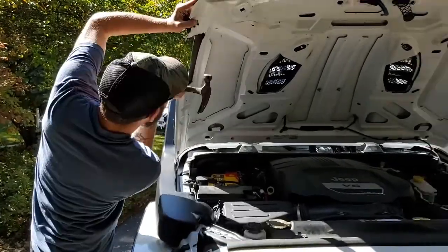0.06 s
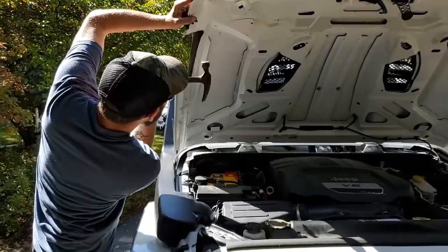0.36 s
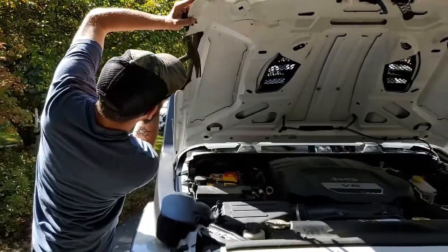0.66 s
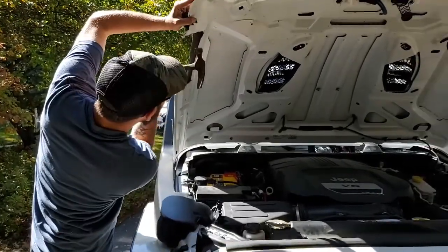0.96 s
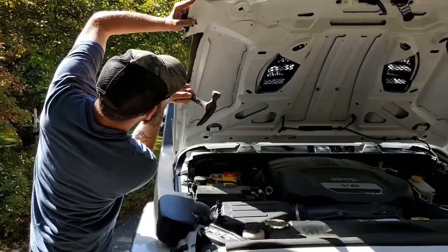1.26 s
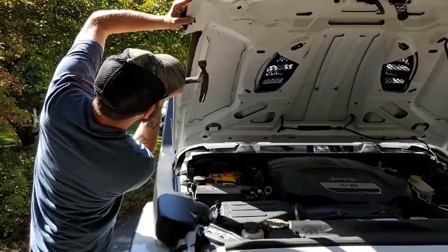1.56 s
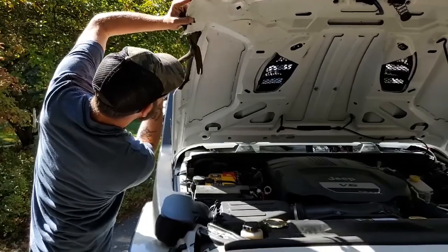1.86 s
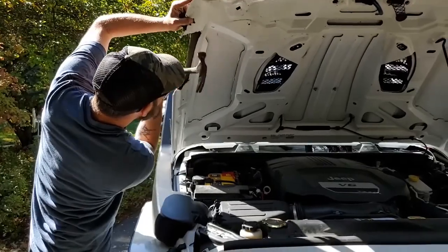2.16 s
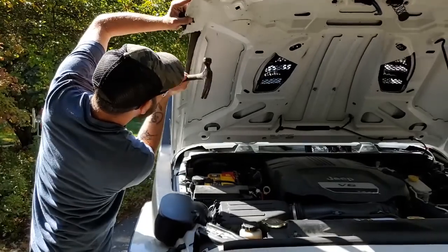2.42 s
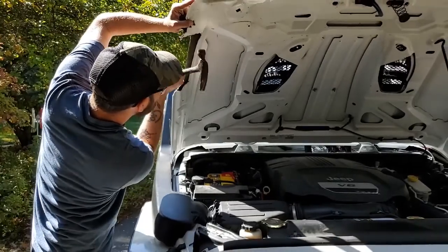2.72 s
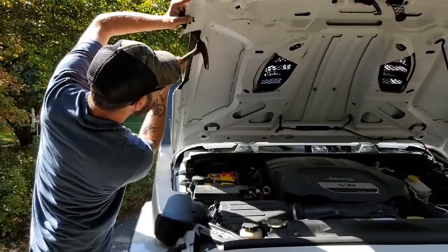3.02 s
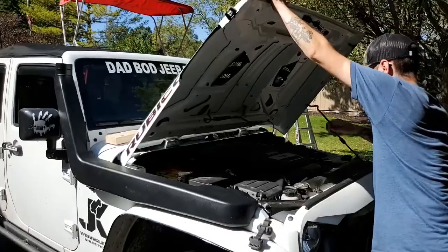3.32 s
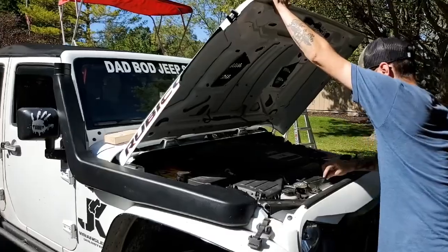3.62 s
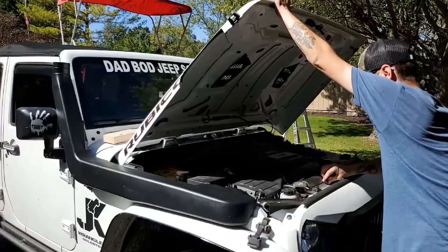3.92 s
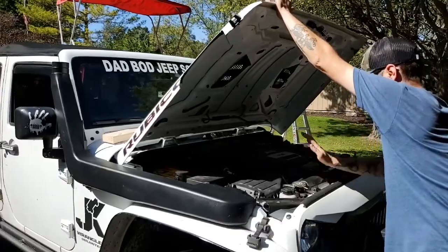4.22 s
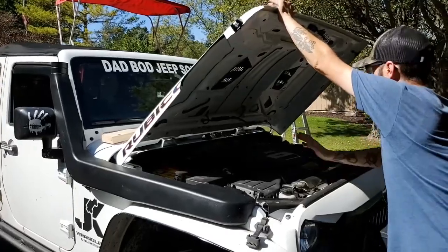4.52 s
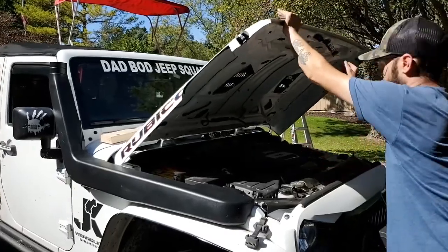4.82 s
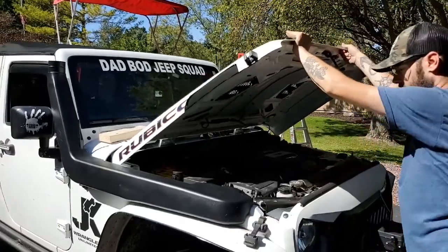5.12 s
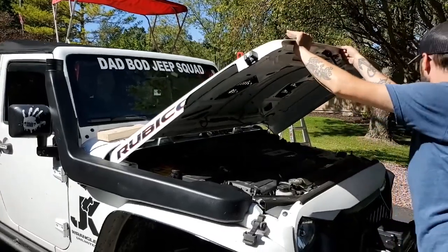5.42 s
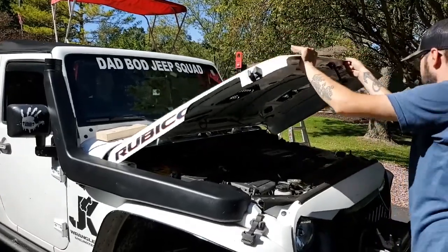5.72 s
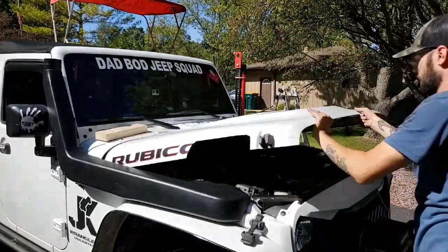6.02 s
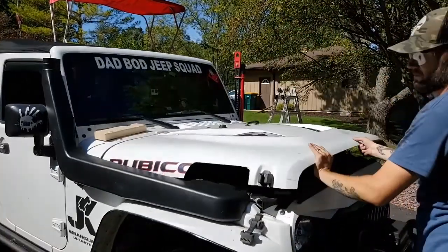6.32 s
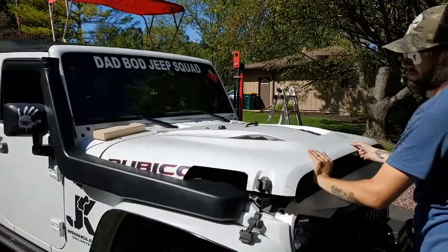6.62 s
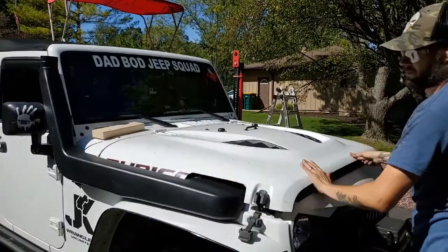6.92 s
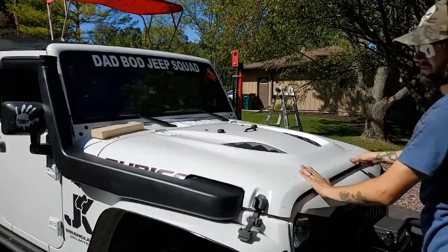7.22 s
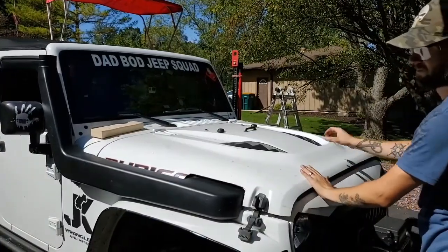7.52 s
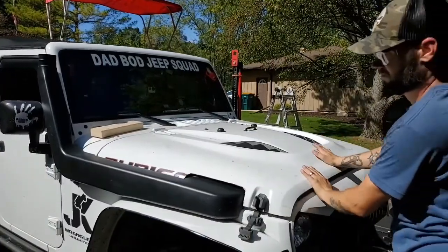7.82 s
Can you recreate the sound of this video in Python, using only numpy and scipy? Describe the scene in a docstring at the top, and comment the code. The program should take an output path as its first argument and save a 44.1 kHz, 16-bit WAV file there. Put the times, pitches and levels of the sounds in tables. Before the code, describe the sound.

From the very start, a hammer strikes the edge of a raised steel car hood eight times, about every 0.4 seconds, each blow a loud, bright clang with low drumming and a short ring. The last lands near 2.9 seconds and the ringing cuts off at 3.1. Tools knock lightly in the engine bay until about 3.9 seconds. At 4.2 the prop rod snaps into its clip with a sharp metallic clack. A few tiny knocks and faint rubs follow between 4.7 and 6.3 seconds as the hood is lowered. At 6.8 it drops on its catch with a loud boom and clash, bounces at 7.0 and rattles softly. At 7.6 it is pressed shut with another boom. Underneath, the outdoor setting is very quiet, with a far rumble, soft air and spells of thin, high hiss.

```python
"""Outdoors at a car, a hammer strikes the edge of the raised steel hood eight times; the panel's crowded
high modes clang and its low ones drum. The ringing breaks off, tools knock about in the engine bay and
the prop rod clacks into its clip. The hood is lowered with a faint rub, drops on its catch, bounces and
is pressed shut with a boom. A far rumble, soft air and spells of thin hiss lie underneath."""
import sys
import numpy as np
from scipy import signal
from scipy.fft import rfft, irfft, next_fast_len
from scipy.io import wavfile
from scipy.ndimage import map_coordinates

SR = 44100
rng = np.random.default_rng(int(sys.argv[2]) if len(sys.argv) > 2 else 0)


def wav_record(signal):
    """Record a signal, one row per channel, as 16-bit PCM in the file named by sys.argv[1]."""
    frames = np.transpose(np.atleast_2d(signal))
    bounded = np.clip(frames, -1, 1)
    # unit amplitude maps onto the largest positive 16-bit level
    quanta = np.round(bounded * 32767).astype(np.int16)
    wavfile.write(sys.argv[1], SR, quanta)


N = 346626
RING_S = np.arange(int(0.8 * SR)) / SR  # time axis of one impact
BREAK_S = 3.088  # hammer ringing stops short

# blows (time [s], drumming [dB], clang [dB], sizzle [dB], ping [dB], clink [dB], bark [dB])
BLOWS = [(0.069, -3.5, 0.5, -15, -0.5, -9.5, -7), (.461, -2, 2, -1, -6.5, -0.5, -15),
         (.877, -0.5, 3, -7.5, 2.5, -9.5, -8), (1.274, -0.5, 5, -4, 2, -3, -10),
         (1.678, 0, 1.5, -0.5, -5.5, 0.5, -13), (2.087, 1, 0.5, -2.5, -14, -5.5, -19.5),
         (2.472, 1, 2.5, -2, -8, -2, -11.5), (2.854, 1, 3, -0.5, -4.5, -2, -10.5)]
# raised hood (frequency [Hz], level [dB], t60 [s])
RAISED_MODES = [(42.3, -17.5, 0.57), (50.3, -17.5, 0.45), (66.8, -13, 0.45), (95, -17, 0.48),
                (120, -17.5, 0.58), (142, -14, 0.45), (159.5, -9, 0.47), (171.5, -22, 0.58),
                (181.5, -17.5, 0.88), (215.1, -13.5, 0.4), (244.3, -18, 0.42), (289.8, -16, 0.41),
                (314.4, -15, .33), (325.5, -17.5, 0.38), (377, -17, 0.34), (403, -18.5, 0.25),
                (454.5, -17, 0.37), (480.7, -12.5, 0.32), (520, -14.5, 0.4), (583, -13.5, 0.26),
                (666, -21.5, 0.3), (750, -23, 0.24), (1017, -19.5, 0.23), (1194, -17, 0.18),
                (1342, -21.5, 0.24), (1520, -25, 0.28), (1607, -25.5, 0.33)]
# stiff rim, the ping (frequency [Hz], level [dB], t60 [s])
RIM_MODES = [(2070, -23, 0.15), (2290, -21, 0.14)]
# steel on steel, the clink (frequency [Hz], level [dB], t60 [s])
STEEL_MODES = [(3790, -21.5, 0.1), (3920, -18, 0.053), (4260, -23.5, 0.048), (4400, -25, .08)]
# hood's crowded higher modes (frequency [Hz], density [dB])
CLANG_SPECTRUM = [(200, -27.5), (400, 6), (620, 1), (900, -0.5), (1200, -1.5), (1800, -5.5), (2600, -5.5),
                  (4200, -10.5), (6500, -17), (10000, -13.5), (14000, -14)]
# their decay (frequency [Hz], t60 [s])
CLANG_DECAY = [(200, 0.55), (600, 0.43), (2000, 0.35), (4500, 0.37), (8000, 0.36), (14000, 0.22)]
def hammer():
    """Blows land near one spot: long waves repeat from blow to blow, short ones differ."""
    track, spot = np.zeros((2, N)), white()
    panel = mode_rings(RAISED_MODES, rise_s=0.0083)
    rim = mode_rings(RIM_MODES, rise_s=0.0025)
    steel = mode_rings(STEEL_MODES, rise_s=0.002)
    crossover_hz, rattle_delay_s, rattle_fade_s = 500, 0.052, 0.018
    for at_s, drum_db, clang_db, sizzle_db, ping_db, clink_db, bark_db in BLOWS:
        repeated = filtered(spot, lambda hz: np.cos(np.arctan(hz / crossover_hz)))
        fresh = filtered(white(), lambda hz: np.sin(np.arctan(hz / crossover_hz)))
        colour = [(2000, clang_db), (7000, sizzle_db)]
        sheet = clang(repeated + fresh, CLANG_SPECTRUM, CLANG_DECAY, colour,
                      rise_s=0.0024, crack_db=10, crack_s=0.0028, uneven_db=2.5)
        add(track, at_s, amp(-15.5) * sheet)
        add(track, at_s, amp(drum_db - 3.5) * strike(panel, scatter_db=2.56, drift=0.008))
        add(track, at_s, amp(ping_db) * strike(rim, scatter_db=0.85, drift=0.005))
        add(track, at_s, amp(clink_db) * strike(steel, scatter_db=-0.12, drift=0.0087))
        add(track, at_s + 0.00089, amp(bark_db) * flange_bark())
        add(track, at_s, amp(drum_db - 17) * edge_echo())
        # the shaken sheet rattles once more
        rattle = equalise(stereo(white(), CLANG_SPECTRUM), colour) * np.exp(-RING_S / rattle_fade_s)
        add(track, at_s + rattle_delay_s * (1 + 0.25 * rng.uniform(-1, 1)), amp(-25.5) * rattle)
    tick = stereo(white(), [(1000, 3), (14000, -16)]) * np.exp(-RING_S / 0.0034)
    add(track, BREAK_S - 0.004, amp(-41) * tick)
    gate = np.clip((BREAK_S - np.arange(N) / SR) / 0.00049, 0, 1)
    return track * gate


def flange_bark():
    """The struck flange sounds two brief notes, the lower sinking, before the panel takes its motion."""
    start_hz, sag_hz_per_s, upper_hz, peak_s = 565, 1100, 1200.7, 0.013
    lower_hz = start_hz * (1 + 0.034 * rng.uniform(-1.2, 1)) - sag_hz_per_s * RING_S
    lower = np.sin(2 * np.pi * np.cumsum(lower_hz) / SR)
    upper = amp(-7) * np.sin(2 * np.pi * upper_hz * RING_S)
    envelope = (RING_S / peak_s * np.exp(1 - RING_S / peak_s)) ** 2
    return (lower + upper) * envelope


# wave reflected at the hood's far edge (frequency [Hz], density [dB])
ECHO_SPECTRUM = [(150, -14.5), (280, 0.5), (400, -4.5), (540, 2), (1500, -29)]
def edge_echo():
    """The bending wave returns smeared from the far edge; short waves run faster and arrive first."""
    trip_s = 0.045 * (1 + 0.06 * rng.uniform(-1, 1))  # round trip at 1 kHz
    burst = rng.standard_normal(len(RING_S)) * np.exp(-RING_S / 0.012)
    dispersion = lambda hz: np.exp(-4j * np.pi * trip_s * np.sqrt(1000 * hz))
    wave = filtered(burst, lambda hz: amp(along(ECHO_SPECTRUM, hz)) * dispersion(hz))
    return wave / np.abs(wave).max()


# hood meets catch and rubber stops (time [s], boom [dB], clash [dB], edge [dB])
CONTACTS = [(6.783, -43.5, -23, -29.5), (6.807, -9.5, -7, -15.5), (6.822, 2, -13.5, -32),
            (6.854, -6.5, -9, -24), (6.984, -7, -17.5, -28.5), (7.015, -19, -22.5, -43),
            (7.086, -29, -35, -53), (7.124, -30, -32, -50), (7.186, -35, -47, -60),
            (7.291, -37, -34.5, -57), (7.617, -5, -18, -32.5)]
# lowered hood (frequency [Hz], level [dB], t60 [s])
LOWERED_MODES = [(42.75, -14.5, 0.71), (53.6, -12.5, 0.39), (81, -16, 0.55), (108.3, -15, 0.52),
                 (150.2, -19.5, 0.42), (256.4, -19.5, 0.33), (265.4, -25.5, 0.44), (306, -16.5, 0.24),
                 (393.6, -15, 0.22), (472.6, -17.5, 0.21)]
# steel catch (frequency [Hz], level [dB], t60 [s])
CATCH_MODES = [(1130, -23, 0.38), (1508, -14.5, 0.29), (2980, -8, 0.15)]
# clash of hood on catch (frequency [Hz], density [dB])
CLASH_SPECTRUM = [(100, 4), (250, -3), (480, -4), (750, -6), (1400, -11.5), (2000, -15), (3000, -12.5),
                  (4200, -12), (6500, -21), (14000, -24)]
# its decay (frequency [Hz], t60 [s])
CLASH_DECAY = [(200, 0.56), (800, 0.31), (3000, 0.39), (12000, 0.34)]
def hood_closing():
    """The catch clashes and rattles; the hood's weight sets the whole panel booming."""
    track = np.zeros((2, N))
    panel = mode_rings(LOWERED_MODES, rise_s=0.0083)
    catch = mode_rings(CATCH_MODES, rise_s=0.0021)
    for at_s, boom_db, clash_db, edge_db in CONTACTS:
        colour = [(1200, clash_db), (4500, edge_db)]
        rattle = amp(2.1 * wobble(130)[:len(RING_S)])
        clash = clang(white(), CLASH_SPECTRUM, CLASH_DECAY, colour,
                      rise_s=0.012, crack_db=10, crack_s=0.0099, uneven_db=4)
        add(track, at_s, rattle * clash)
        add(track, at_s, amp(boom_db) * strike(panel, scatter_db=4.5, drift=0.016))
        # the middle of the skin flexes a moment later
        add(track, at_s + 0.016, amp(clash_db - 5) * ping(489.7, t60_s=0.1, spread=0.11))
        add(track, at_s, amp(-6) * equalise(strike(catch, scatter_db=2, drift=0.014), colour))
    return track


# tools, prop rod and hands (time [s], thud [dB], body [dB], edge [dB], ping [Hz])
KNOCKS = [(3.152, -37, -25.5, -32, 640), (3.428, -39, -43.5, -45.5, 773), (3.721, -40, -37, -48, 608),
          (3.818, -45, -51, -50, 780), (3.852, -40, -37.5, -46, 540), (3.886, -44.5, -34, -34.5, 798),
          (4.206, -17, -17, -12, 528), (4.697, -50, -55, -54, 1426), (4.981, -54, -46.5, -49.5, 855),
          (6.293, -32, -36, -52.5, 1527)]
# engine bay (frequency [Hz], level [dB], t60 [s])
BAY_MODES = [(70, -21.5, 0.36), (130, -18, 0.45), (211, -15.5, 0.45), (256.4, -7, 0.24), (405, -7.5, 0.2),
             (485.6, -2, 0.21), (1270, -16, 0.095)]
# knock on bodywork (frequency [Hz], density [dB])
KNOCK_SPECTRUM = [(50, -9), (130, 5), (220, 1.5), (380, -3.5), (520, 2), (900, -4), (1300, -11),
                  (1800, -13), (2800, -14.5), (4200, -17), (6500, -26.5), (14000, -32.5)]
# its decay (frequency [Hz], t60 [s])
KNOCK_DECAY = [(150, 0.49), (600, 0.31), (3000, 0.33), (12000, 0.24)]
def bay_knocks():
    """Hard things knock on the bodywork, each with its own weight, edge and pitch."""
    track = np.zeros((2, N))
    bay = mode_rings(BAY_MODES, rise_s=0.0052)
    for at_s, thud_db, body_db, edge_db, ping_hz in KNOCKS:
        colour = [(200, thud_db), (500, body_db), (1300, body_db), (4500, edge_db)]
        knock = clang(white(), KNOCK_SPECTRUM, KNOCK_DECAY, colour,
                      rise_s=0.0066, crack_db=4, crack_s=0.036, uneven_db=4.5)
        add(track, at_s, knock)
        add(track, at_s, amp(thud_db + 1.5) * strike(bay, scatter_db=-2, drift=0.02))
        add(track, at_s, amp(body_db + 0.5) * ping(ping_hz, t60_s=0.1, spread=0.089))
    return track


# steel rod (frequency [Hz], level [dB], t60 [s])
ROD_MODES = [(240, -20, .2), (1270, -14, 0.075), (3834, -25.5, .1), (4140, -19, 0.069), (5200, -27.5, .09)]
def prop_rod():
    """The rod rings briefly as it snaps into its clip."""
    track = np.zeros((2, N))
    rod = mode_rings(ROD_MODES, rise_s=0.0026)
    add(track, at_s=4.207, sound=amp(1.5) * strike(rod, scatter_db=0.6, drift=0.002))
    return track


# hands and hinge rub (time [s], length [s], level [dB])
RUBS = [(5.0, 0.097, -58), (5.29, 0.11, -54.5), (5.57, 0.28, -70)]
# friction noise (frequency [Hz], density [dB])
RUB_SPECTRUM = [(600, -9.5), (1800, -4.5), (3300, -6.5), (6500, -16)]
def rubbing():
    """Faint, uneven friction as the hood is gripped and lowered."""
    return spells(RUBS, rise_s=0.0085, fall_s=0.035) * amp(1.9 * wobble(70)) * noise(RUB_SPECTRUM)


# far rumble (frequency [Hz], density [dB])
RUMBLE_SPECTRUM = [(25, -11), (42, 1), (70, 6.5), (95, 3), (140, -8), (190, -16), (260, -5.5), (400, -41.5),
                   (900, -82)]
# moving air (frequency [Hz], density [dB])
AIR_SPECTRUM = [(100, -1), (300, 12), (600, 1.5), (1000, -2.5), (1700, -6.5), (2700, -13), (3600, -12.5),
                (4700, -8.5), (5800, -23), (9000, -30.5)]
# thin hiss, perhaps insects (frequency [Hz], density [dB])
HISS_SPECTRUM = [(3000, -30), (4600, -3.5), (5800, -30.5), (8000, -9.5), (10500, -4.5), (13000, 8.5),
                 (14200, 3.5), (14800, -23.5)]
# its spells (time [s], length [s], level [dB])
HISS_SPELLS = [(1.2, 1.06, -62), (3.08, 0.5, -56.5), (4.01, 1.407, -58.5), (5.87, .18, -61.5),
               (6.18, 1.23, -60)]
def background():
    """Far rumble, soft air that steps up after the hammering, and a hiss that comes and goes."""
    rumble = amp(-52 + 1.2 * wobble(1)) * noise(RUMBLE_SPECTRUM)
    step_db = 1.5 * (np.arange(N) / SR > BREAK_S)
    air = amp(-62.5 + step_db + 0.37 * wobble(9.1)) * noise(AIR_SPECTRUM)
    hiss = spells(HISS_SPELLS, rise_s=0.045, fall_s=0.04) * noise(HISS_SPECTRUM)
    return rumble + air + hiss


def clang(grain, spectrum, decay, colour, rise_s, crack_db, crack_s, uneven_db):
    """Crowded, uneven modes: a bright contact crack, then each band swells and dies at its own rate."""
    knots_hz = np.arange(0, SR / 2, 75)
    depth = np.interp(knots_hz, [0, 1000, 3000, 8000], [0, 1, 0.9, 0.5])
    ripple_db = uneven_db * rng.standard_normal(len(knots_hz)) * depth
    rippled = unit(filtered(grain, lambda hz: amp(np.interp(hz, knots_hz, ripple_db))))
    pair = equalise(stereo(rippled, spectrum), colour)
    band_hz, t, bands = signal.stft(pair, SR, nperseg=256)
    band_hz = band_hz[:, None]
    envelope = np.exp(-np.log(1000) * t / along(decay, band_hz)) * swell(band_hz, t, rise_s)
    ring = signal.istft(bands * envelope, SR, nperseg=256)[1][:, :len(RING_S)]
    crack = amp(crack_db) * np.exp(-RING_S / crack_s) * filtered(pair, lambda hz: hz / (hz + 4000))
    attack = 1 - np.exp(-RING_S / 0.00045)
    return (ring + crack) * attack


def mode_rings(modes, rise_s):
    """Pitch and complex ring of each mode; far from the contact, neighbours alternate in sign."""
    hz, db, t60_s = np.transpose(modes)[:, :, None]
    sign = (-1) ** np.arange(len(hz))[:, None]
    rings = np.exp((2j * np.pi * hz - np.log(1000) / t60_s) * RING_S)
    return hz[:, 0], sign * amp(db) * swell(hz, RING_S, rise_s) * rings


def strike(part, scatter_db, drift):
    """A blow rings the modes at new strengths and pitch; short waves reach the two ports out of step."""
    hz, rings = part
    skew_rad = rng.standard_normal((2, len(hz))) * np.minimum(hz / 1400, 2) ** 2
    strength = amp(scatter_db * np.sqrt(hz / 500) * rng.standard_normal(len(hz)))
    pair = np.real(strength * np.exp(1j * skew_rad) @ rings)
    speed = 1 + drift * rng.uniform(-1, 1)
    return np.array([np.interp(RING_S * speed, RING_S, side, right=0) for side in pair])


def ping(hz, t60_s, spread):
    """Five close, quickly damped modes; the higher, the less alike at the two microphone ports."""
    t = RING_S[:len(RING_S) // 4, None]
    modes_hz = hz * (1 + spread * (np.linspace(-1, 1, 5) + rng.uniform(-0.2, 0.2, 5)))
    phases = rng.random(5) + hz / 3000 * rng.random((2, 1, 5))
    waves = np.sin(2 * np.pi * (modes_hz * t + phases)).sum(axis=-1)
    envelope = (np.exp(-np.log(1000) * t / t60_s) * (1 - np.exp(-t * hz / 2)))[:, 0]
    return unit(waves * envelope) * np.sqrt(np.mean(envelope ** 2))


def swell(hz, t, rise_s):
    """Bending-wave speed goes as root frequency, so low notes build later; rise_s holds at 1 kHz."""
    return 1 - np.exp(-t / rise_s * np.sqrt(hz / 1000))


# left-right likeness (frequency [Hz], correlation [-1..1])
CORRELATION = [(100, 0.91), (300, 0.79), (640, 0.63), (1400, 0.25), (3100, .1), (7000, -0.11)]
def stereo(pair, spectrum):
    """Two white noises to a coloured pair of rms 1, alike in the bass, unrelated in the treble."""
    angle = lambda hz: np.arccos(np.clip(along(CORRELATION, hz), -1, 1)) / 2
    split = lambda hz: np.array([np.cos(angle(hz)), np.sin(angle(hz))])
    mid, side = filtered(pair, lambda hz: amp(along(spectrum, hz)) * split(hz))
    return unit(np.array([mid + side, mid - side]))


def noise(spectrum):
    """Coloured stereo noise, scene length."""
    return stereo(rng.standard_normal((2, N)), spectrum)


def white():
    """Two white noises, impact length."""
    return rng.standard_normal((2, len(RING_S)))


def spells(rows, rise_s, fall_s):
    """Gain that rises, holds and dies away once per row."""
    since = lambda at_s: np.maximum(np.arange(N) / SR - at_s, 0)
    return sum(amp(db) * (1 - np.exp(-since(at_s) / rise_s)) * np.exp(-since(at_s + length_s) / fall_s)
               for at_s, length_s, db in rows)


def wobble(rate_hz):
    """Smooth random curve, rate_hz knots a second."""
    knots = rng.standard_normal(int(N * rate_hz / SR) + 4)
    return map_coordinates(knots, [np.arange(N) * rate_hz / SR])


def filtered(x, response):
    """Filter x by a function of frequency."""
    n = x.shape[-1]
    padded = next_fast_len(n + 4096, True)
    return irfft(rfft(x, padded) * response(np.fft.rfftfreq(padded, 1 / SR)), padded)[..., :n]


def equalise(x, curve):
    """Filter x by points of (frequency [Hz], gain [dB])."""
    return filtered(x, lambda hz: amp(along(curve, hz)))


def along(points, hz):
    """Interpolate points on a log frequency axis."""
    knots_hz, values = np.transpose(points)
    return np.interp(np.log(hz + 1), np.log(knots_hz + 1), values)


def amp(db):
    """Decibels to gain."""
    return 10 ** (np.asarray(db) / 20)


def unit(x):
    """Scale to rms 1."""
    return x / np.sqrt(np.mean(x ** 2) + 1e-20)


def add(track, at_s, sound):
    """Mix a sound into the track."""
    start = max(round(at_s * SR), 0)
    part = sound[..., :N - start]
    track[:, start:start + part.shape[-1]] += part


def scene():
    """Work on the hood, in the open air."""
    return hammer() + bay_knocks() + prop_rod() + rubbing() + hood_closing() + background()


# right microphone port, resonance and notch (frequency [Hz], gain over left [dB])
RIGHT_PORT_EQ = [(60, -3), (600, -1.46), (1300, -2.5), (2400, 0), (3200, 3.5), (4000, 8.5), (4800, 7.5),
                 (5600, -3), (6900, -20.5), (8200, -17), (10000, -5), (13000, -1.5)]
def record(dry):
    """The right port colours its channel; deep bass is cut, peaks are rounded, the band ends steeply."""
    low_cut_hz, top_hz = 39, 14600
    ports = np.array([dry[0], equalise(dry[1], RIGHT_PORT_EQ)])
    ports = signal.sosfilt(signal.butter(4, low_cut_hz, "highpass", fs=SR, output="sos"), ports)
    rounded = ports / (1 + ports ** 6) ** (1 / 6)
    return filtered(rounded, lambda hz: 1 / np.sqrt(1 + (hz / top_hz) ** 200))


dry = scene()
out = record(dry)
wav_record(out)
```